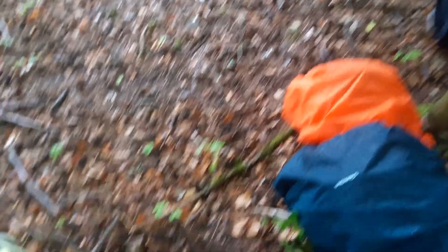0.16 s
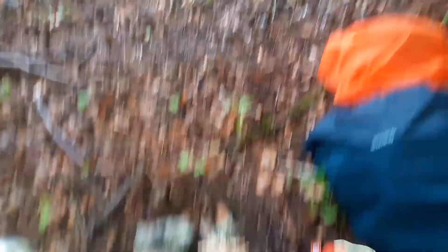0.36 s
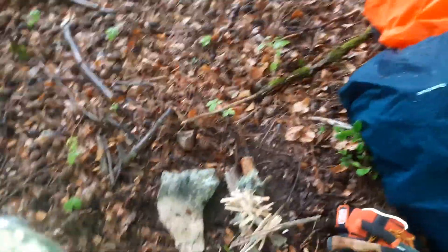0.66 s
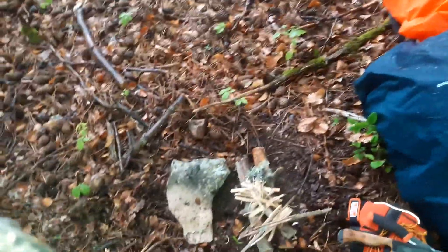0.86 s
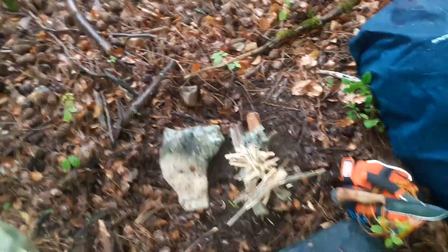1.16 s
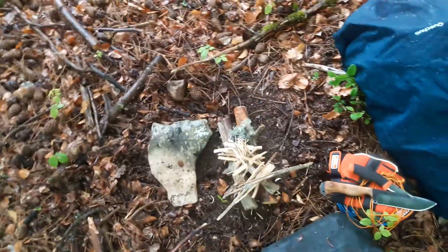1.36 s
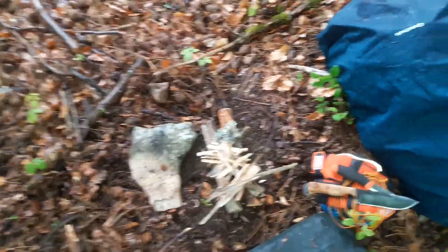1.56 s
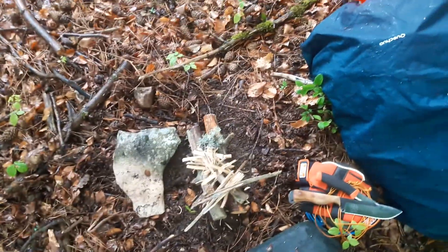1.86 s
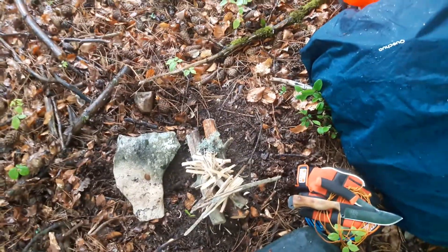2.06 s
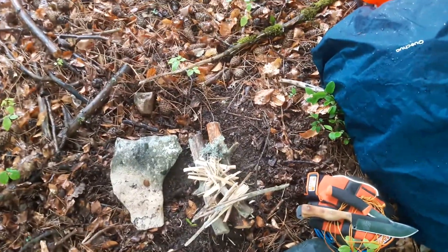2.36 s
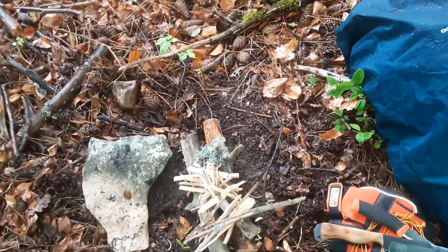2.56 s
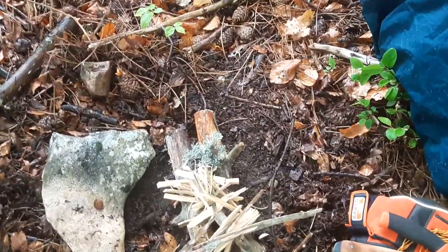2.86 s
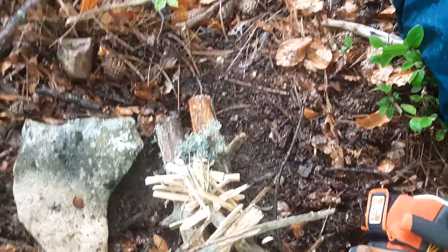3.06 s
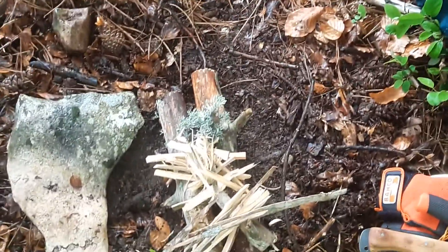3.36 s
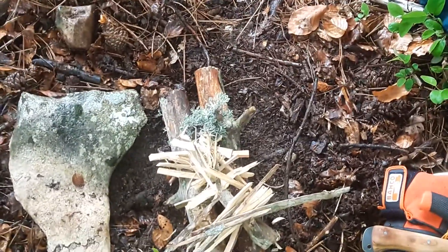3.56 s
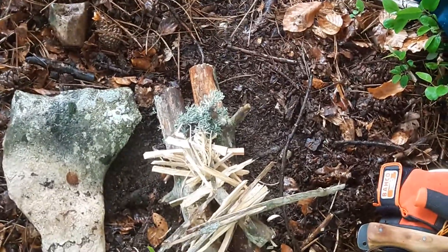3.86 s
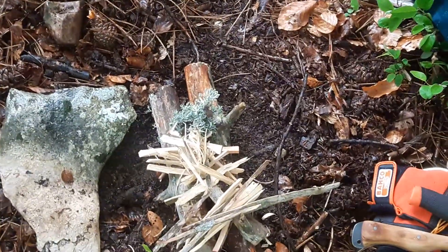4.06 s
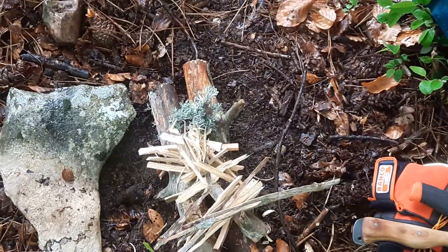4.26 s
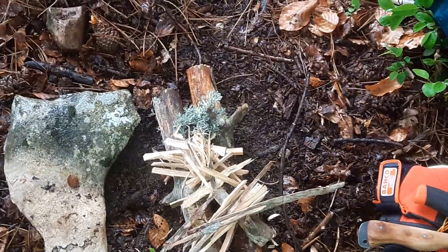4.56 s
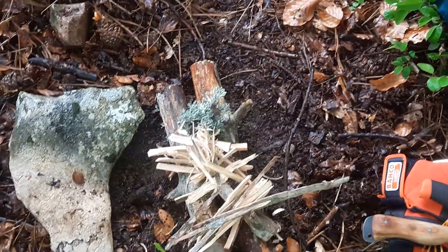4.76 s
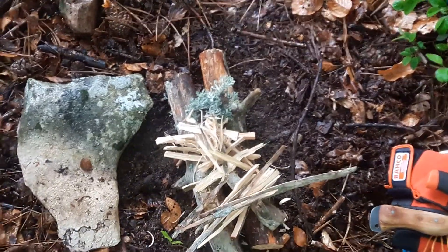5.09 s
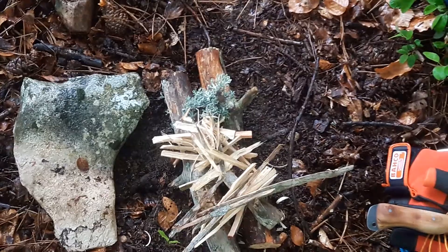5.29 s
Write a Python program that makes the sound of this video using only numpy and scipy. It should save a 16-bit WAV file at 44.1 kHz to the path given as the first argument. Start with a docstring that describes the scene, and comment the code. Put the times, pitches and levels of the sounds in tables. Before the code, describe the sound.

A close stereo microphone low in a wet forest: fat drops slap soft litter with tiny ticks, splashes and dull thuds. Behind them lie random smaller taps, crisp ticks and a wide, fluttering rain hiss. After a quiet opening the rain builds, brings a tight cluster of hard knocks near the middle, thins after four seconds, and ends with a quick run of light drips. The sound is dry, with no long reverberation.

```python
"""A wood in rain, heard from just above a floor of dead leaves. Within arm's reach fat drips slap the litter: a
damped pulse with its ground echo, and noise bursts for the tick, the spray and the soft thud. Curled leaves
answer some drips with three modes; a nylon pack drums. A few steps away lesser drips fall at random, and
smaller drops patter as soft taps and crisp ticks. Beyond them banded noise is the hiss among the trees; it
comes up over the first half-second, then swells and eases."""
import sys
import numpy as np
from scipy import signal
from scipy.fft import rfft, irfft, next_fast_len
from scipy.io import wavfile

SR = 44100
rng = np.random.default_rng(int(sys.argv[2]) if len(sys.argv) > 2 else 0)


def file_out(sig):
    """Save sig as 16-bit WAV at sys.argv[1]."""
    # one column per channel
    cols = np.atleast_2d(sig).T
    # limit, then scale
    lim = np.clip(cols, -1, 1)
    pcm = np.round(lim * 32767).astype(np.int16)
    wavfile.write(sys.argv[1], SR, pcm)


N = 239286
TIME = np.arange(N) / SR
DRIP_SIZE = 3072   # samples given to one drip
SLAP_SIZE = 128   # opening samples over which a slap or a ring is levelled

# lean of the sound to one ear: [f/Hz, left minus right/dB]
BALANCE = [(300, 0), (770, 1), (1300, -1.5), (2700, -0.5), (4200, -4), (6400, -5), (9500, -.5)]
EARS = np.array([[1], [-1]])   # left, right


def from_db(db):
    """Amplitude ratio of a level in dB."""
    return 10 ** (np.asarray(db) / 20)


def rms(x):
    """Root mean square, kept just above zero."""
    return np.sqrt(np.mean(x ** 2) + 1e-20)


def at_hz(points, hz):
    """Read a curve on a log-frequency axis."""
    known_hz, values = np.transpose(points)
    return np.interp(np.log(hz + 1e-3), np.log(known_hz), values)


def in_time(rows):
    """Each column of a curve at every sample."""
    s, *columns = np.transpose(rows)
    return [np.interp(TIME, s, column) for column in columns]


def butter(x, hz, kind, order=2):
    """Butterworth filter."""
    return signal.lfilter(*signal.butter(order, hz, kind, fs=SR), x)


def drift(rate):
    """Random wander: straight lines between normal draws of spread 1, rate of them a second."""
    knots = rng.standard_normal(int(N / SR * rate) + 2)
    return np.interp(TIME * rate, np.arange(len(knots)), knots)


def diffuse_noise(spectrum, size):
    """Stereo noise from all around: alike in most of the bass, unrelated in the treble; rms 1."""
    # likeness of the two ears: [f/Hz, left-right correlation]
    likeness = [(40, -0.51), (140, 0.95), (300, 0.96), (600, 0.84), (1200, 0.11), (2200, -0.013),
                (5000, 0.0089), (15000, -0.012)]
    hz = np.arange(size // 2 + 1) * SR / size
    mid, side = rfft(rng.standard_normal((2, size)))
    alike = np.clip(at_hz(likeness, hz), -.99, .99)
    both = np.sqrt(1 + alike) * mid + EARS * np.sqrt(1 - alike) * side
    level_db = at_hz(spectrum, hz) + EARS * at_hz(BALANCE, hz) / 2
    noise = irfft(both * from_db(level_db), size)
    return noise / rms(noise)


def far_rain(murmur_db, wash_db, sizzle_db, flutter_db):
    """Rain on the canopy, too dense for single drops; it flutters as leaves shed their water."""
    # colour of the far rain within each band: [f/Hz, relative level/dB per Hz]
    wash_spectrum = [(30, -48), (55, -40), (100, -14.5), (170, -6), (380, -4.5), (750, -7), (2000, -2.5),
                     (4200, -8), (6500, -10), (8300, -24.5), (9800, -27.5), (12300, -18), (15800, -21)]
    noise = diffuse_noise(wash_spectrum, size=next_fast_len(N))
    size = noise.shape[1]
    hz = np.arange(size // 2 + 1) * SR / size
    spectrum = rfft(noise)
    together = drift(70)   # flutter shared by the three bands
    edges_hz = [0, 700, 3000, SR]
    out = np.zeros((2, N))
    for low, high, level_db in zip(edges_hz, edges_hz[1:], (murmur_db, wash_db, sizzle_db)):
        band = irfft(spectrum * ((hz >= low) & (hz < high)), size)[:, :N]
        flutter = flutter_db * (together + 1.3 * drift(110))
        out += band / rms(band) * from_db(level_db + flutter)
    return out


def ear_clock(lag_ms):
    """Seconds since the hit at each ear, 0 before it; the far ear hears it a moment later."""
    delay_s = np.maximum(-EARS * lag_ms / 1000, 0)   # a positive lag delays the right ear
    return np.maximum(np.arange(DRIP_SIZE) / SR - delay_s, 0)


def any_echo_ms():
    """Delay of the ground echo at each ear, for a leaf at any height."""
    return rng.uniform(0.46, 1.24, size=2)


def slap(hz, lag_ms, echo_ms, echo_share=0.73):
    """A drop flattens on a leaf: one push and one pull of air, and its echo off the ground close by."""
    ring_q, top_hz = 0.7, 5500   # ring of the leaf; top edge of the sharpest slap
    round_share, bass_share = 1.69, 0.34   # a slap thins out above and below these multiples of its pitch
    age = ear_clock(lag_ms)
    push = np.cos(2 * np.pi * hz * age) * np.exp(-np.pi * hz * age / ring_q) * (age > 0)
    # the leaf gives way beneath it with a slower swing
    give = np.sin(2 * np.pi * 430 * age) * np.exp(-age / 0.00059)
    wave = push + 0.26 * butter(give, 550, "high", order=1)
    wave = butter(wave, round_share * hz, "low")
    wave = butter(wave, top_hz, "low", order=4)
    wave = butter(wave, bass_share * hz, "high")   # a small leaf radiates no bass
    # the short detour cuts notches that give every drop its own colour
    bright = butter(wave, 1470, "high", order=1)
    t = TIME[:DRIP_SIZE]
    echo = np.stack([np.interp(t - ms / 1000, t, ear, left=0) for ms, ear in zip(echo_ms, bright)])
    wave = wave + echo_share * echo
    return wave / rms(wave[:, :SLAP_SIZE])


def burst(spectrum, rise_s, fall_s, colour_db=2.5):
    """Noise that swells and dies away, coloured anew by each patch of litter; no deep bass."""
    t = np.arange(DRIP_SIZE) / SR
    coloured = [(hz, level_db + colour_db * rng.standard_normal()) for hz, level_db in spectrum]
    envelope = (1 - np.exp(-t / rise_s)) * np.exp(-t / fall_s)
    return butter(diffuse_noise(coloured, size=DRIP_SIZE) * envelope, 104, "high")


def droplets():
    """The spray lands in small separate lumps: an uneven gain of rms 1."""
    per_s, spread_db = 905, 4.5
    at = np.arange(DRIP_SIZE) / SR * per_s
    sizes = from_db(spread_db * np.clip(rng.standard_normal(size=256), -2, 2))
    gain = np.interp(at, np.arange(len(sizes)), sizes)
    return gain / rms(gain)


def drip(slap_db, hz, tick_db, spray_db, thud_db, lag_ms, echo_ms):
    """One drop: slap and tick at contact, then flying droplets and the litter settling."""
    # the crack of first contact: [f/Hz, relative level/dB per Hz]
    tick_spectrum = [(800, -54), (2200, 7), (4400, 8), (6500, -1), (8500, -21), (12500, -14.5),
                     (16000, -19)]
    # droplets thrown over the leaves: [f/Hz, relative level/dB per Hz]
    spray_spectrum = [(200, -40), (600, 3.5), (1100, 5.5), (2000, 5), (3000, 0), (4600, -3), (6500, -8.5),
                      (8500, -23), (12500, -21), (16000, -35)]
    # the springy litter under a hit: [f/Hz, relative level/dB per Hz]
    thud_spectrum = [(40, -99), (90, -43), (160, 5.5), (250, -4), (340, 6.5), (550, -6.5), (900, -18),
                     (2000, -53)]
    # every part has its own fixed trim in dB
    push = from_db(slap_db - 1.2) * slap(hz, lag_ms, echo_ms)
    tick = from_db(tick_db + 10.0) * burst(tick_spectrum, rise_s=.0001, fall_s=0.00089)
    spray = from_db(spray_db + 11.0) * burst(spray_spectrum, rise_s=0.0036, fall_s=0.009) * droplets()
    thud = from_db(thud_db + 9.5) * burst(thud_spectrum, rise_s=0.0006, fall_s=0.0086)
    return push + tick + spray + thud


def knock(hz, swell_ms, lag_ms):
    """One mode of a stiff dead leaf swells to its peak and dies away."""
    age = ear_clock(lag_ms)
    swell = 1000 * age / swell_ms
    envelope = swell * np.exp(1 - swell)   # height 1
    lean = from_db(EARS * at_hz(BALANCE, hz) / 2)
    wave = lean * envelope * np.sin(2 * np.pi * hz * age)
    return butter(wave, 270, "high")   # the ring carries no bass


def leaf_ring(slap_hz, lag_ms, count=2):
    """Every leaf has modes of its own, higher for small leaves, which reach each ear differently."""
    wave = 0
    for pitch, left, right in rng.random((count, 3)):
        hz = 1.198 * slap_hz * 2.56 ** pitch   # just above the slap pitch, over a span of 2.56
        swell_ms = 1000 * 0.7 / hz   # 0.7 of a cycle to peak
        reach = np.cos(2 * np.pi * np.array([[left], [right]]))
        wave = wave + reach * knock(hz, swell_ms, lag_ms)
    wave = butter(wave, 5200, "low", order=4)
    return wave / rms(wave[:, :SLAP_SIZE])


def stray_drip(slap_db, hz, tick_db, spray_db, thud_db, lag_ms):
    """A drop on any leaf, coloured by that leaf's ring."""
    ring = from_db(slap_db - 2) * leaf_ring(hz, lag_ms)
    return drip(slap_db, hz, tick_db, spray_db, thud_db, lag_ms, any_echo_ms()) + ring


def patter(per_s, spread_db, low_hz, high_hz, tick_db, spray_db, thud_db, count=48):
    """Small drops fall at random on leaves of many sizes and bearings; rms 1."""
    out = np.zeros((2, N + DRIP_SIZE))
    falls_per_leaf = int(per_s * N / SR / count)
    for hz in np.geomspace(low_hz, high_hz, count):
        leaf = stray_drip(0, hz, tick_db, spray_db, thud_db, lag_ms=rng.uniform(-0.48, 0.48))
        for when, distance in rng.random((falls_per_leaf, 2)):
            at = int(when * N)
            # far drops outnumber near ones
            out[:, at:at + DRIP_SIZE] += leaf * from_db(-spread_db * np.sqrt(distance))
    return out[:, :N] / rms(out)


def lesser_drips(bed_db):
    """Smaller drips a few steps away fall at random, more often and louder while the level between drips is up."""
    per_s, follows = 9, .65   # mean rate; share of the rain's swing that rate and level follow
    middle_db, spread_db = -40, 4   # slap in rain of ordinary vigour, give or take
    low_hz, high_hz = 695, 1740   # range of slap pitch
    parts_db = np.array([-20, -12, -18])   # tick, spray and thud against the slap, before their trims
    surface_db = 2   # give or take: each patch of litter ticks, sprays and thuds differently
    middle_lag_ms, lag_spread_ms = -0.18, 0.16   # bearing: right ear later by, give or take
    out = np.zeros((2, N + DRIP_SIZE))
    count = int(per_s * N / SR)
    fallen = np.cumsum(from_db(follows * bed_db))   # water gathered on the branches so far
    places = rng.random((count, 2))
    chances = rng.uniform(-0.95, 1, (count, 5))
    for k, ((when, pitch), chance) in enumerate(zip(places, chances)):
        # each equal portion of the water lets one drip go
        at = np.searchsorted(fallen, (k + when) / count * fallen[-1])
        slap_db = middle_db + follows * bed_db[at] + spread_db * chance[0]
        tick_spray_thud_db = slap_db + parts_db + surface_db * chance[2:]
        hz = low_hz * (high_hz / low_hz) ** pitch
        lag_ms = middle_lag_ms + lag_spread_ms * chance[1]
        out[:, at:at + DRIP_SIZE] += stray_drip(slap_db, hz, *tick_spray_thud_db, lag_ms)
    return out[:, :N]


def pack():
    """A nylon pack drums, slack cloth over a soft load: one low, quickly damped mode, alike at both ears."""
    # drummings, level before the bass cut: [t/s, f/Hz, level/dB, time to fall to 1/e/s]
    drummings = [(1.857, 344, -31, 0.0069), (2.1806, 381, -17.5, 0.006), (2.195, 393, -24.5, 0.0042),
                 (2.212, 400, -29, .005), (2.776, 193, -18, 0.0044), (2.829, 261, -16, 0.0036),
                 (3.1593, 350, -20.5, .003), (3.331, 600, -27, 0.0043), (3.9335, 436, -22, 0.0039)]
    out = np.zeros(N)
    for s, hz, level_db, ring_s in drummings:
        age = np.maximum(TIME - s, 0)
        out += from_db(level_db) * np.sin(2 * np.pi * hz * age) * np.exp(-age / ring_s)
    return butter(out, 240, "high")


def leaf_knocks():
    """A hard drip lands on a curled leaf close by, which answers with three modes."""
    # hard drips, part levels before their trims, mode levels before balance and bass cut:
    # [t/s, slap/dB, slap f/Hz, tick/dB, spray/dB, thud/dB, right ear later/ms, ground echo later/ms,
    #  time for the ring to peak/ms, low f/Hz, level/dB, middle f/Hz, level/dB, high f/Hz, level/dB]
    curled_leaves = [(0.3963, -29, 1900.0, -55.0, -36, -46.0, -0.14, 0.36, 0.26, 1420, -16.5, 2300, -17, 4850.0, -36.5),
                     (1.2074, -21, 1030.0, -55.0, -43, -46, 0.094, 1.09, 0.59, 1430, -18.5, 1850, -23, 4060.0, -35),
                     (1.4257, -16.5, 1000, -40, -37.5, -42.5, -0.14, 0.6, 0.89, 1260, -24, 3370, -22, 3420, -18),
                     (1.5154, -32.7, 600.0, -55.0, -37.5, -42.5, -0.041, 1.4, 0.59, 1540.0, -22, 3760, -24.5, 5060.0, -28.4),
                     (1.5627, -17, 760.0, -32, -40.5, -44.0, -0.08, 0.92, 0.77, 1370.0, -23.4, 2270, -21, 4340.0, -22),
                     (1.623, -23, 560.0, -29.5, -36.5, -40.5, -0.0048, 0.59, 0.84, 1150, -19, 1930, -19.5, 4810.0, -34),
                     (1.9263, -33.6, 490.0, -36, -35, -43, -0.27, 1.01, 1.2, 1210.0, -23.5, 2750.0, -36.0, 4680, -25),
                     (2.1802, -22, 540, -34, -34.5, -38, -0.27, 0.8, 0.64, 1730.0, -19.6, 3450, -25, 4680.0, -23.0),
                     (2.4064, -26, 1170.0, -33, -42.5, -40.5, 0.24, 0.42, 0.7, 2340.0, -19, 2820, -21, 3950, -37),
                     (2.6729, -25.5, 1010, -27, -34.5, -57, 0.13, 0.95, 0.41, 1490.0, -13.5, 1990.0, -20, 3640.0, -23),
                     (2.7352, -23.5, 1040.0, -27, -39.5, -44, 0.1, 1.35, 0.37, 2240.0, -20.1, 3010.0, -21.8, 4170, -11.5),
                     (2.774, -22, 554, -43.0, -34.5, -41, 0.032, 0.95, 0.43, 1440, -19.5, 3150.0, -22.6, 4230, -19.5),
                     (2.8273, -23.5, 660.0, -25, -33, -35, 0.33, 1.4, 0.65, 1700.0, -16.7, 2120, -13.5, 5400, -24.5),
                     (2.872, -32, 1080.0, -48.0, -33.5, -37.5, 0.26, 1.24, 0.8, 850.0, -25.5, 2460.0, -20, 4060.0, -32.1),
                     (2.919, -26.5, 670.0, -32, -38, -39.0, 0.284, 0.93, 0.29, 1510.0, -26.3, 1970.0, -23.6, 4450.0, -18.5),
                     (3.0532, -26, 1330.0, -35, -38.5, -45.5, 0.12, 0.95, 0.25, 2120.0, -21, 3510.0, -22, 4760, -20),
                     (3.159, -34, 1330.0, -42.0, -42.5, -46.0, 0.07, 1.16, 0.7, 1370.0, -25, 3250.0, -33, 5110.0, -29),
                     (4.4203, -17.5, 660, -27.5, -38.5, -38.5, -0.13, 0.75, 0.76, 1020, -18.4, 2570, -17.5, 3900, -25),
                     (4.5545, -22, 1030.0, -41, -42, -46, -0.16, 0.8, 0.41, 1780.0, -16.5, 2230, -24, 4050, -23),
                     (4.8963, -20, 720, -36, -47, -43, -0.045, 0.74, 0.41, 1630.0, -26.7, 1970.0, -19.5, 3550.0, -23),
                     (5.2896, -24.4, 1690.0, -44, -44.5, -50, 0.079, 0.27, 0.39, 1860, -17, 2700, -31.7, 3500, -26)]
    out = np.zeros((2, N + DRIP_SIZE))
    for s, *blow, lag_ms, echo_ms, swell_ms, f1, db1, f2, db2, f3, db3 in curled_leaves:
        at = int(s * SR)
        modes = [(f1, db1), (f2, db2), (f3, db3)]
        ring = sum(from_db(level_db) * knock(hz, swell_ms, lag_ms) for hz, level_db in modes)
        out[:, at:at + DRIP_SIZE] += drip(*blow, lag_ms, (echo_ms, echo_ms)) + ring
    return out[:, :N]


def near_drips():
    """The drips on soft litter within arm's reach."""
    # drips, levels before the trims of their parts:
    # [t/s, slap/dB, slap f/Hz, tick/dB, spray/dB, thud/dB, right ear later/ms]
    soft_drips = [(.076, -40, 1000, -57, -53, -60, -.03), (.099, -42, 900, -57, -53, -56.5, 0.0024),
                  (.52, -30, 625, -47, -42.5, -46, -0.35), (.5603, -31, 1000, -40, -57, -64, 0.094),
                  (.618, -30.5, 1220, -40, -50, -65, 0.079), (0.8172, -28, 885, -41, -41.5, -50, -0.38),
                  (0.8871, -31, 780, -39, -44, -47.5, -0.31), (0.9591, -32.5, 1500, -47, -45, -61, -0.099),
                  (1.115, -36.5, 1900, -46, -48, -67, 0), (1.3594, -24, 774, -35, -45, -52, -.34),
                  (1.386, -34, 1500, -39, -40, -53, 0), (1.742, -31, 900, -39.5, -40, -52, -0.29),
                  (1.7904, -30.5, 1310, -53, -43.5, -48.5, 0.08), (1.856, -46, 1400, -40, -40.5, -48, -0.5),
                  (1.9047, -31.5, 1100, -44, -39, -44, -0.25), (2.039, -26, 1240, -37.5, -45, -51, 0.34),
                  (2.103, -27.5, 846, -49, -45, -49, -0.25), (2.1491, -24.5, 1390, -35, -44, -50, 0.2),
                  (2.21, -27, 710, -38, -36.5, -48, -0.42), (2.276, -23.5, 725, -27, -44, -43, -.02),
                  (2.286, -28, 1500, -37, -35, -47.5, 0.14), (2.3353, -32.5, 900, -34.5, -48, -63, -0.053),
                  (2.5734, -25.5, 1290, -48, -42, -55, 0), (2.727, -28, 1700, -34, -40, -52, 0.19),
                  (3.2269, -34, 2100, -40, -43, -58, 0.051), (3.3072, -29.5, 1090, -40, -49, -54, -0.29),
                  (3.3424, -27.5, 1300, -46, -37, -47, 0.26), (3.4225, -27.5, 1300, -38, -48, -51, -0.18),
                  (3.4808, -27, 1410, -28.5, -58, -57, 0.11), (3.5269, -29.5, 1700, -31, -51, -57, 0.27),
                  (3.5452, -30, 800, -33, -44, -43, -0.25), (3.5848, -24.5, 860, -32.5, -36.5, -45, -0.19),
                  (3.775, -26.5, 710, -37, -48, -44.5, -0.21), (3.8316, -19.5, 536, -33.5, -40, -51, -.13),
                  (3.8499, -26.5, 690, -35, -37, -44.5, -.22), (3.9031, -19, 1100, -45, -61, -55, 0.093),
                  (3.934, -25, 503, -57, -51, -57, 0.074), (4.025, -36, 1150, -37.5, -36, -55, 0),
                  (4.133, -34, 806, -36.5, -37.5, -37, -0.15), (4.259, -29.5, 795, -44, -39.5, -48, -0.15),
                  (4.306, -26, 745, -38, -43, -56, -0.15), (4.5989, -31.5, 1500, -38, -43, -47.5, -0.1),
                  (4.7763, -36, 1510, -40, -57, -74, 0.015), (4.9189, -30.5, 1050, -43, -54, -53, -0.18),
                  (4.9494, -32, 1260, -37, -51, -47, 0.15), (4.9785, -34, 1300, -38, -37.5, -46, -0.13),
                  (4.9922, -27, 1240, -45, -46, -47, -0.17), (5.0194, -30, 1200, -38, -47, -53, 0.2),
                  (5.0401, -30.5, 1250, -39.5, -54, -51, -0.12),
                  (5.0842, -32.5, 1100, -35, -56, -48.5, -0.19), (5.333, -26.5, 960, -40, -40, -48, -0.3)]
    out = np.zeros((2, N + DRIP_SIZE))
    for s, *blow in soft_drips:
        at = int(s * SR)
        out[:, at:at + DRIP_SIZE] += drip(*blow, any_echo_ms())
    return out[:, :N]


def scene():
    """Drips close by, patter around them, hiss beyond; all but the nearest drips and pack follow the level
    between drips."""
    # level between drips; it comes up over the first half-second, then swells and eases: [t/s, level/dB]
    bed_curve = [(0.0, -58), (0.12, -58), (0.23, -53), (0.56, -46), (1.12, -43), (1.9, -44),
                 (2.36, -39.5), (2.57, -41), (2.84, -39), (3.75, -42), (4.0, -40.5), (4.2, -41),
                 (4.34, -45.5), (4.62, -47), (4.84, -47), (5.0, -44), (5.43, -44.5)]
    bed_db = in_time(bed_curve)[0] + 42.5   # against rain of ordinary vigour, at -42.5 dB
    # share of the rain's swing that each band follows
    murmur_db, wash_db, sizzle_db = 0.77 * bed_db, 0.81 * bed_db, 0.56 * bed_db
    hiss = far_rain(-52.5 + murmur_db, -48.5 + wash_db, -49 + sizzle_db, flutter_db=1.5)
    # soft taps on sodden leaves
    taps = from_db(-45 + wash_db) * patter(
        per_s=160, spread_db=15.5, low_hz=637, high_hz=1850, tick_db=-17.0, spray_db=-15.0, thud_db=-29.5)
    # crisp ticks on stiff leaves
    ticks = from_db(-47 + sizzle_db) * patter(
        per_s=240, spread_db=9.5, low_hz=1090, high_hz=3350, tick_db=1.0, spray_db=-4, thud_db=-30)
    return hiss + taps + ticks + lesser_drips(bed_db) + pack() + leaf_knocks() + near_drips()


def record(dry):
    """The sound fades in from 22 to 46 ms; the top is cut above 16 kHz."""
    opening = np.clip((TIME - .022) / 0.024, 0, 1) ** 2
    top_cut = signal.ellip(10, .2, 70, 16000, fs=SR, output="sos")
    return signal.sosfilt(top_cut, dry * opening)


dry = scene()
out = record(dry)
file_out(out)
```